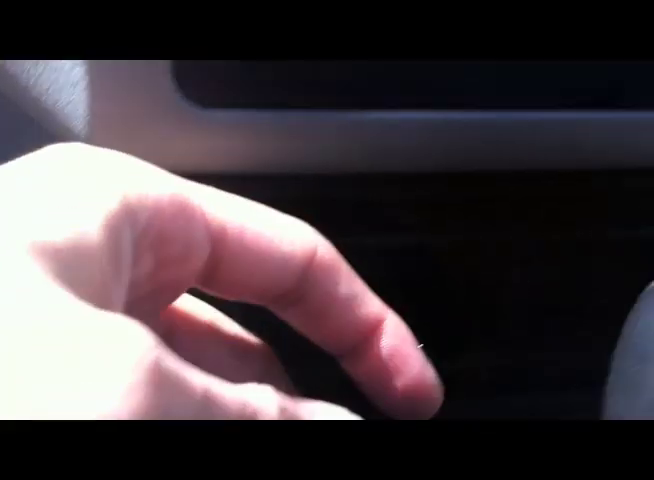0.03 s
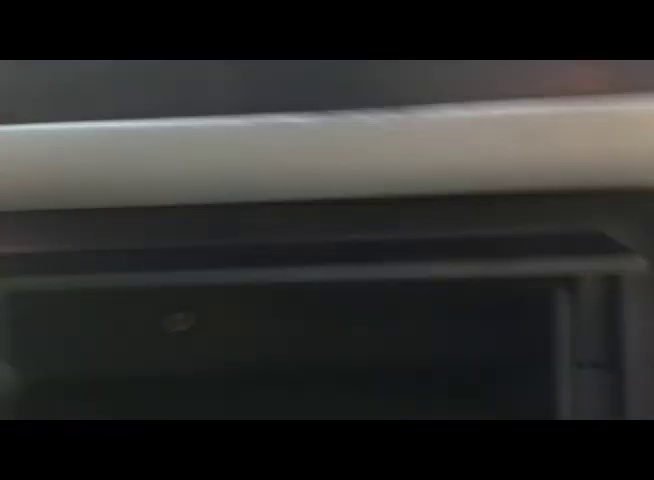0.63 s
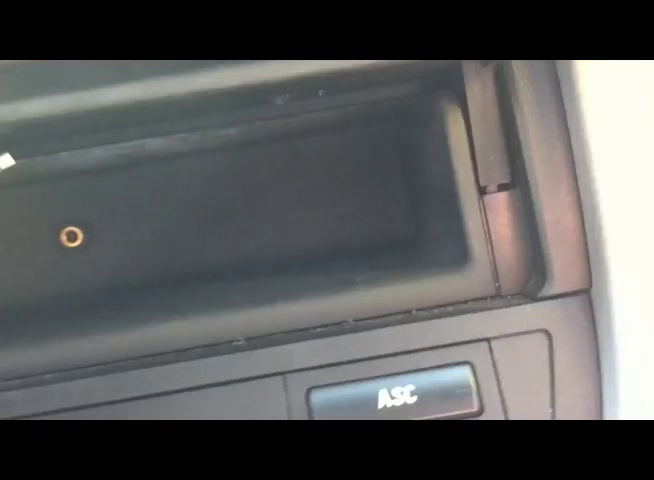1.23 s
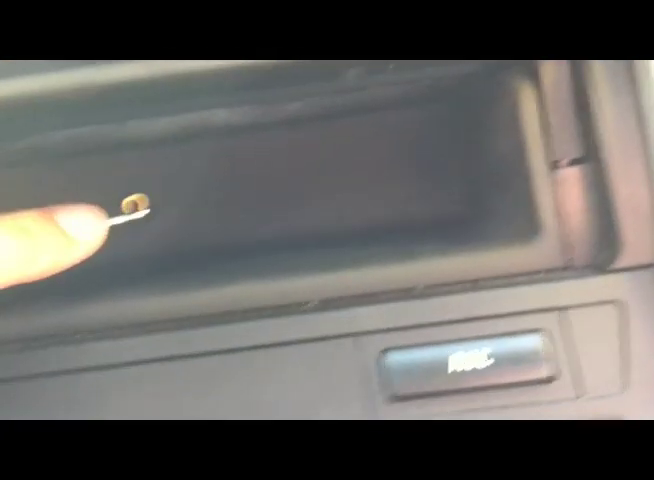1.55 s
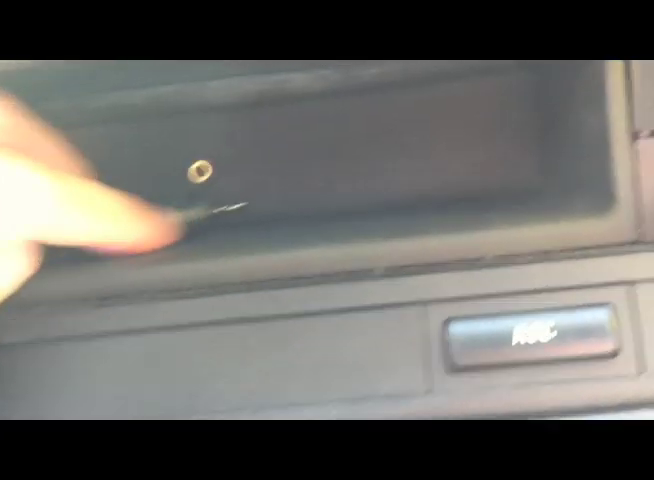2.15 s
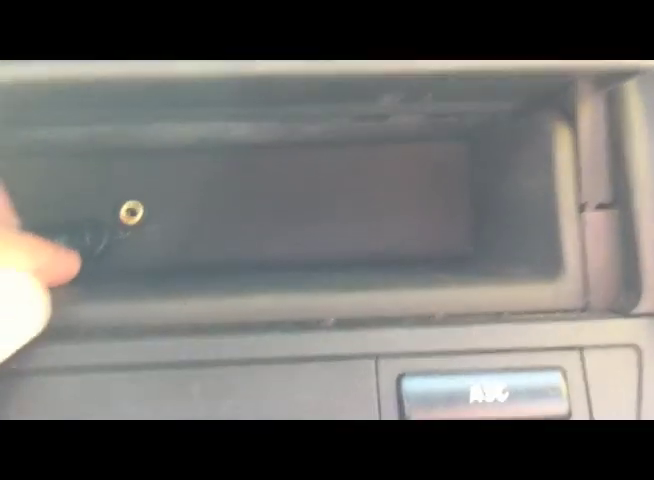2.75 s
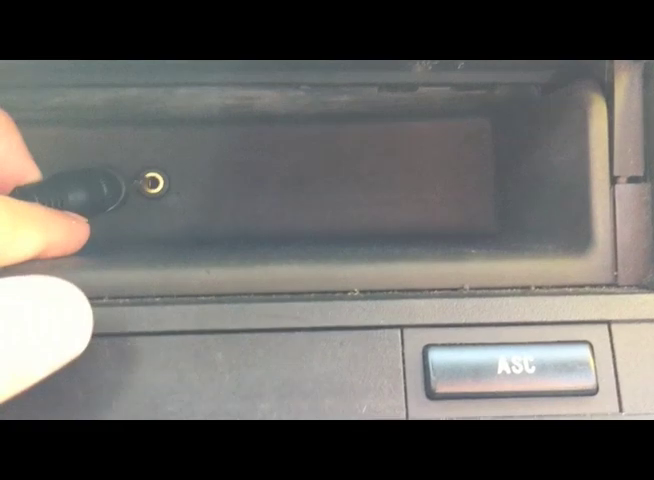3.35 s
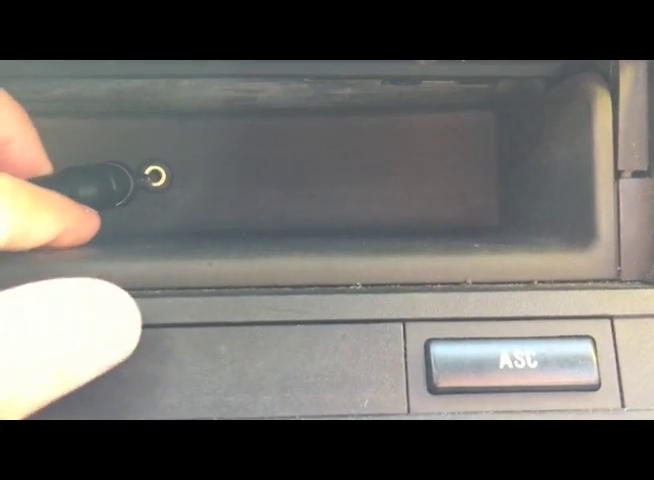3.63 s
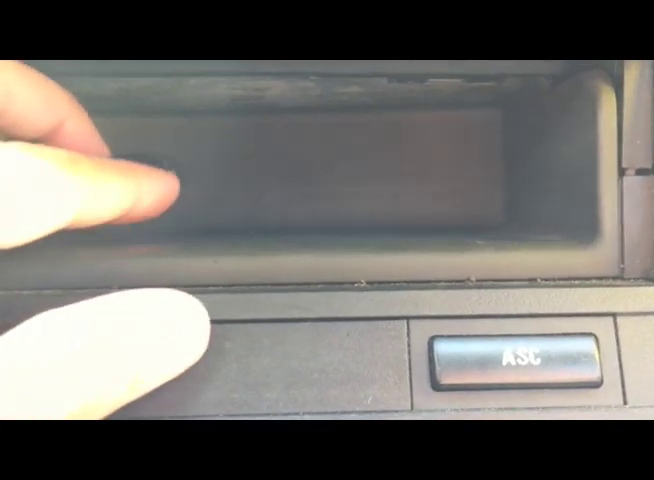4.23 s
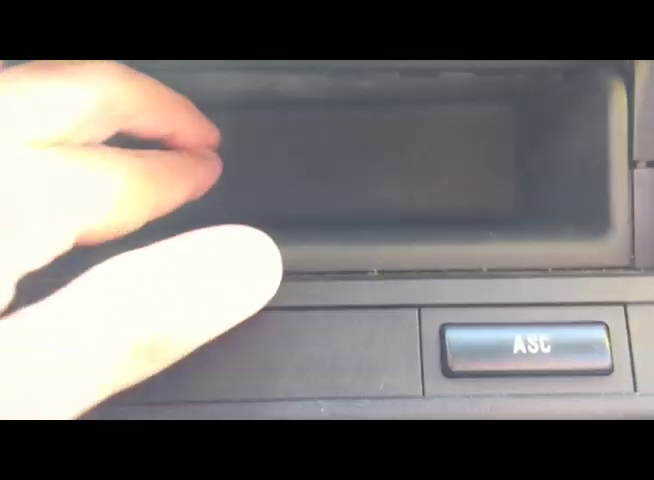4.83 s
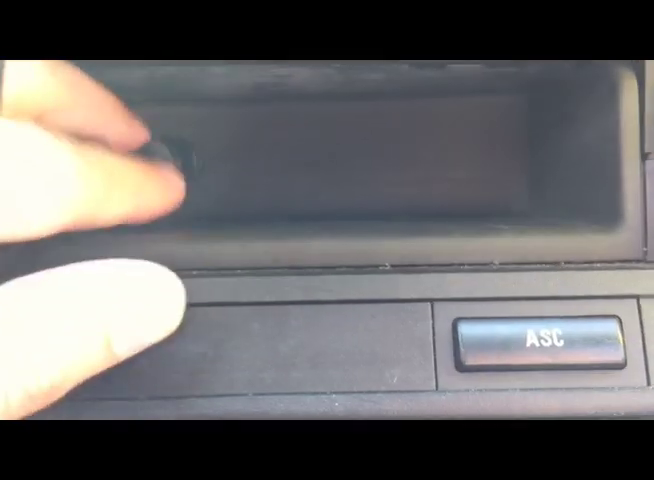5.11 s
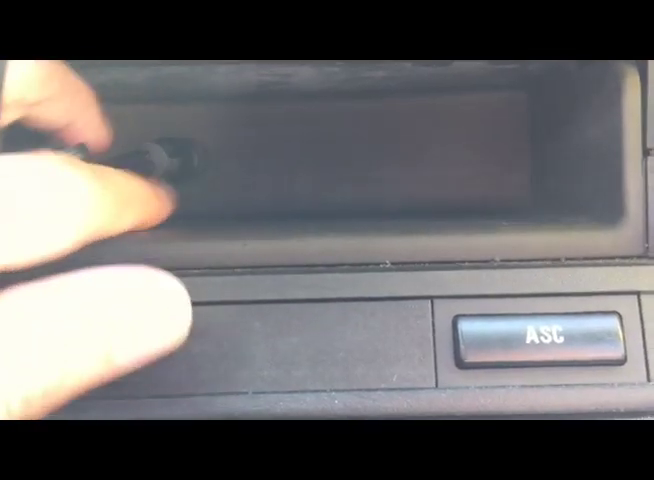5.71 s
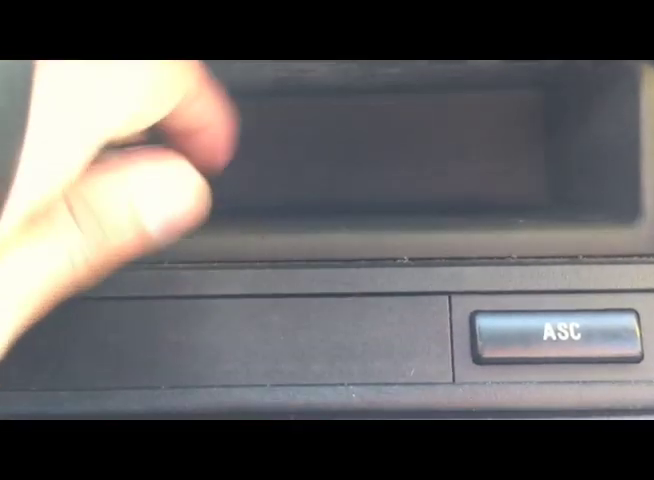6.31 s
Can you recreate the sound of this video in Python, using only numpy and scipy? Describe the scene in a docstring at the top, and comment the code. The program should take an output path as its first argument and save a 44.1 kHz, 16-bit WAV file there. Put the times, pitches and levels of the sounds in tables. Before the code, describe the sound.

Inside a parked car, a sleeve rustles softly as a hand feeds a cable into a plastic dashboard cubby. The metal tip of a small audio plug taps and scrapes around its socket, with dull hollow knocks, low rubs and tiny squeaks. The fumbling grows busier, then the plug snaps home with a loud double click and a few lighter taps. A small microphone picks it up close by, over faint cabin hiss.

```python
"""Inside a parked car: a hand feeds a cable into a plastic dashboard cubby and works a small audio plug
into its socket. The metal tip taps and scrapes around the hole amid low rubs and dull pushes, then the
plug snaps home with a loud double click. Each contact rings the cubby's hollow (thud), the panel
(knock) and the plug and socket (tick). A sleeve rustles at first, over the faint hiss of the cabin."""
import sys
import numpy as np
from scipy import signal
from scipy.fft import rfft, irfft
from scipy.io import wavfile

SR = 44100
rng = np.random.default_rng(int(sys.argv[2]) if len(sys.argv) > 2 else 0)


def put_to_file(sound):
    """Save the sound as 16-bit audio at rate SR, in the file named by the first command-line argument."""
    columns = np.atleast_2d(sound).T  # one column per channel
    safe = np.clip(columns, -1, 1)
    whole_steps = np.round(safe * 32767)
    wavfile.write(sys.argv[1], SR, whole_steps.astype(np.int16))


N = 289586

# modes of the cubby's hollow, the plastic panel, the plug and socket: f/Hz, width/Hz, gain/dB
HOLLOW_MODES = [(144.5, 41, -6), (185, 41, -4), (260, 35, 2.5), (373, 104, -3.5), (516, 114, -4.5)]
PANEL_MODES = [(644, 173, 3), (748, 36, 7.5), (848.6, 55, 4), (1161, 45, 3), (1288, 88, 1.5),
               (1542, 20.6, -0.5), (1667, 185, -6.5)]
PLUG_MODES = [(2280, 150, 2.5), (2560, 110, 1.5), (2960, 510, -0.5), (3656, 730, 0.5), (4520, 1290, -2),
              (5530, 530, 0), (6390, 1110, -3.5), (8590, 1200, -5.5), (12140, 3900, -10.5),
              (14700, 880, -7.5)]


def from_db(db):
    """Decibels to gain."""
    return 10 ** (np.asarray(db) / 20)


def rms(x):
    """Root mean square, never zero."""
    return np.sqrt(np.mean(x ** 2) + 1e-30)


def at_level(x, db):
    """Scale to an rms level."""
    return from_db(db) * x / rms(x)


def at_attack(x, db):
    """Scale by the rms level of the first 8 ms."""
    return from_db(db) * x / rms(x[:SR // 125])


def drift(rate_hz, size):
    """Random wander, spread near 1."""
    knots = np.arange(size) / SR * rate_hz
    return 1.2 * np.interp(knots, np.arange(4000), rng.standard_normal(4000))


def roll_off(x, hz, kind, order):
    """Butterworth low-pass or high-pass."""
    sos = signal.butter(order, np.clip(hz, 20, .45 * SR), kind, fs=SR, output="sos")
    return signal.sosfilt(sos, x)


def resonate(x, hz, width_hz):
    """One resonance, peak gain 1."""
    r = np.exp(-np.pi * width_hz / SR)
    feedback = [1, -2 * r * np.cos(2 * np.pi * hz / SR), r * r]
    return signal.lfilter(np.array([1, 0, -1]) * (1 - r * r) / 2, feedback, x + 1e-18)


def body(x, modes):
    """Parallel modes, alternating in sign."""
    return sum((-1) ** k * from_db(db) * resonate(x, hz, width_hz)
               for k, (hz, width_hz, db) in enumerate(modes))


def add(track, start_s, sound):
    """Mix a sound in at a time."""
    at = max(int(start_s * SR), 0)
    track[at:at + len(sound)] += sound[:max(N - at, 0)]


def coloured_noise(spectrum):
    """Noise of rms 1, shaped by rows of f/Hz, density/dB."""
    hz, db = np.transpose(spectrum)
    bins_hz = np.arange(N // 2 + 1) * SR / N
    gain = from_db(np.interp(np.log(bins_hz + 1), np.log(hz), db))
    return at_level(irfft(rfft(rng.standard_normal(N)) * gain, N), 0)


def burst(t, t60_s):
    """Decaying shower of tiny impulses, energy 1."""
    shower = rng.standard_normal(len(t)) * from_db(-60 * t / t60_s) * (1 - np.exp(-t / 0.00052))
    return shower / np.linalg.norm(shower)


def slips(size, per_s, spread_db):
    """Stick-slip: random jerks of uneven strength, rms 1."""
    jerks = (rng.random(size) < per_s / SR) * rng.standard_normal(size)
    return at_level(jerks * from_db(spread_db * np.minimum(rng.exponential(1, size), 3)), 0)


def soften(x, tick_re_db, middle_hz, middle_db):
    """Metal on metal is bright; a softer touch, with less tick re knock, loses its top."""
    octaves = np.tanh((tick_re_db - middle_db) / 4)
    return roll_off(x, middle_hz * 2 ** octaves, "low", order=1)


def slide_pressure(length_s, waver_db):
    """Envelope of one slide: grip, waver, release."""
    t = np.arange(SR // 2) / SR
    grip = np.clip(t / 0.0084, 0, 1)
    release_db = -60 * np.maximum(t - length_s, 0) / 0.11
    return grip * from_db(release_db + waver_db * drift(45.8, len(t)))


def cabin():
    """Faint steady hiss."""
    # f/Hz, relative density/dB
    spectrum = [(30, -10), (60, -42), (105, -13), (140, -15.5), (180, -6), (400, -15), (1070, -21.5),
                (1630, -21.5), (3200, -25.5), (5700, -26.5), (16000, -29.5)]
    return at_level(coloured_noise(spectrum), -66)


def sleeve():
    """Cloth swishes and flutters as the arm reaches in, then rests."""
    # arm movement: t/s, swish/dB, flutter/dB (both before trim)
    movement = [(0, -65, -66), (0.3, -63, -69), (0.55, -59.5, -59), (0.85, -60.5, -64), (1.1, -67, -69.5),
                (1.3, -80, -78)]
    # cloth spectra: f/Hz, relative density/dB
    swish_spectrum = [(500, -13), (900, -26), (1250, -10), (2200, -2.5), (3000, -5.5), (6000, -5),
                      (8250, -6), (9600, -13.5), (13200, -9.5), (16000, -16)]
    flutter_spectrum = [(60, -32), (135, -4.5), (270, 3), (420, 1), (600, -8), (800, -7.5), (1100, -20),
                        (2000, -59)]
    swish_trim_db, flutter_trim_db = -0.4, 4.3
    t = np.arange(N) / SR
    times_s, swish_db, flutter_db = np.transpose(movement)
    swish_gain = from_db(np.interp(t, times_s, swish_db) + swish_trim_db + .5 * drift(39.6, N))
    swish = swish_gain * coloured_noise(swish_spectrum)
    flutter_gain = from_db(np.interp(t, times_s, flutter_db) + flutter_trim_db + 2.2 * drift(70, N))
    flutter = flutter_gain * coloured_noise(flutter_spectrum)
    fade = from_db(-60 * np.maximum(t - times_s[-1], 0))
    return fade * (swish + flutter)


def handling():
    """Plug and cable brush the trim, with stray touches; both grow as the hand gets busier."""
    # activity of the hand: t/s, base level/dB
    activity = [(0.5, -67.5), (0.97, -69), (1.41, -70.5), (1.97, -59.5), (2.49, -68), (2.73, -65.5),
                (3.06, -71), (3.42, -89), (4.36, -60.5), (4.48, -49.5), (4.57, -58), (4.97, -64.5),
                (5.12, -82), (5.41, -57.5), (5.55, -56), (5.76, -65), (5.93, -57.5), (6.07, -63.5),
                (6.29, -57), (6.56, -61.5)]
    reach_s, touches_per_s = 0.5, 4
    t = np.arange(N) / SR
    base_db = np.interp(t, *np.transpose(activity))
    coarse = slips(N, per_s=400, spread_db=10)
    fine = slips(N, per_s=6100, spread_db=2)
    knock = roll_off(body(coarse, PANEL_MODES), 2000, "low", order=2)
    thud = roll_off(body(coarse + fine, HOLLOW_MODES), 410, "low", order=2)
    thud = roll_off(thud, 100, "high", order=2)
    grain = roll_off(body(fine + from_db(7) * coarse, PLUG_MODES), 3000, "low", order=1)
    brush = at_level(knock, 2) + at_level(thud, -2) + at_level(grain, -14)
    out = from_db(base_db + 0.82 * drift(20, N)) * np.minimum(t / reach_s, 1) * brush
    for k, (jitter, strength, spot) in enumerate(rng.uniform(-1, 1, (80, 3))):
        at_s = reach_s + (k + .5 * jitter) / touches_per_s
        if at_s < t[-1]:
            knock_db = base_db[int(at_s * SR)] + 2 + 2 * strength
            add(out, at_s, tap(knock_db, tick_drive_db=-11.5, spot_hz=1060 * 2 ** (.5 * spot)))
    return out


def tap(knock_db, tick_drive_db, spot_hz):
    """One touch: a push into panel and hollow, plus brief metallic chatter driven relative to it."""
    t = np.arange(SR // 6) / SR
    push = 1. * (t == 0)
    spot = resonate(push + from_db(-0.5) * burst(t, t60_s=0.033), spot_hz, width_hz=400)
    ringing = at_attack(spot, 0) + at_attack(body(spot, PANEL_MODES), -1)
    knock = roll_off(ringing, 2.39 * spot_hz, "low", order=3)  # a softer, lower spot yields more slowly
    hollow = body(push + from_db(-5) * burst(t, t60_s=0.087), HOLLOW_MODES)
    thud = roll_off(hollow, 470, "low", order=3)
    # high spots and light touches stir the hollow less
    thud_db = knock_db - 9.5 - np.log2(spot_hz / 950) - 0.13 * max(-45 - knock_db, 0)
    chatter = burst(t, t60_s=0.022)
    scatter = from_db(-11.5) * burst(t, t60_s=0.071)  # off hard trim close by
    tick = soften(body(chatter + scatter, PLUG_MODES), tick_drive_db, middle_hz=5700, middle_db=-7)
    tick_db = knock_db + tick_drive_db + 1.77
    return at_attack(thud, thud_db) + at_attack(knock, knock_db) + at_attack(tick, tick_db)


def slide(length_s, thud_db, knock_db, grain_db):
    """Coarse slips drive panel and hollow; fine grain hisses in the plug's modes."""
    pressure = slide_pressure(length_s, waver_db=2.46)
    # a light touch catches now and then, a firm one grinds
    per_s = np.clip(900 * from_db(knock_db + 50.5), 300, 2000)
    coarse = pressure * slips(len(pressure), per_s, spread_db=2)
    fine = pressure * slips(len(pressure), per_s=9000, spread_db=0.5)
    thud = roll_off(body(coarse + fine, HOLLOW_MODES), 520, "low", order=2)
    thud = roll_off(thud, 147, "high", order=2)
    knock = roll_off(body(coarse, PANEL_MODES), 2100, "low", order=2)
    grain = body(fine + from_db(-12.5) * coarse, PLUG_MODES)
    grain = soften(grain, grain_db - knock_db, middle_hz=7100, middle_db=-15.5)
    sound = at_level(thud, thud_db) + at_level(knock, knock_db) + at_level(grain, grain_db)
    return rms(pressure) * sound


def squeak(length_s, first_hz, last_hz, db):
    """Stick-slip locks roughly to one gliding pitch: steadier when low, raspier when high."""
    pressure = slide_pressure(length_s, waver_db=0.4)
    hz = np.interp(np.arange(len(pressure)) / SR, [0, length_s], [first_hz, last_hz])
    unsteady = roll_off(rng.standard_normal((2, SR)), 0.035 * first_hz, "low", order=2)[:, -len(hz):]
    phase = 2 * np.pi * np.cumsum(hz) / SR
    tone = pressure * (unsteady[0] * np.cos(phase) + unsteady[1] * np.sin(phase))
    return rms(pressure) * at_level(tone, db)


def plug_taps():
    """Plug and fingers strike around the hole: metal ticks strongly, skin weakly."""
    # single touches: t/s, knock level/dB, tick drive/dB, spot f/Hz
    touches = [(0.9295, -52.5, -23, 890), (1.011, -54, -4, 930), (1.2359, -69, 10.5, 890),
               (1.35, -43.5, -16, 800), (1.392, -67.5, 13.5, 900), (1.5418, -36.5, -3, 1100),
               (1.6104, -50, -18, 770), (1.9518, -39.5, -18, 570), (2.1512, -42.5, 1, 1130),
               (2.2295, -46, -2, 1090), (2.4356, -43.5, -22, 620), (2.538, -45.5, -9.5, 570),
               (2.6183, -53, -6, 740), (2.7234, -46, -14.5, 745), (3.1875, -54.5, -12, 1120),
               (3.3451, -46, -6.5, 990), (3.3976, -40.5, -11.5, 790), (3.691, -47.5, -13.5, 1230),
               (3.8604, -57, -3, 1240), (3.876, -51, -22, 1550), (4.094, -48.5, -13, 1260),
               (4.1161, -52.5, -12, 1310), (4.269, -51.5, -15, 1240), (4.2958, -48.5, -17, 1230),
               (4.3336, -40.5, -35, 1300), (4.3374, -39, -34, 736), (4.428, -34.5, -5.5, 860),
               (4.5063, -35.5, -5.5, 900), (4.7322, -38.5, -4, 874), (4.8508, -44, -11, 890),
               (4.8637, -42.5, -11.5, 880), (5.0499, -44, -1.5, 1500), (5.059, -47, -5, 1250),
               (5.111, -38, -6, 1090), (5.367, -47, -15, 740), (5.518, -49.5, -14, 740),
               (5.5544, -50.5, 8, 1260), (5.6843, -29.5, -10, 804), (6.0745, -39.5, -32, 900),
               (6.0935, -35, -14, 900), (6.103, -24, -16.5, 610), (6.1469, -38, -5.5, 910),
               (6.2848, -39.5, -6, 1050), (6.4142, -38.5, -11.5, 910), (6.549, -38.5, -7.5, 1110)]
    # dull landings that slip off an edge and click: t/s, knock level/dB, slip delay/s, landing f/Hz
    catches = [(1.9817, -42, .0238, 636), (2.04, -38, .0346, 574), (4.5751, -33, 0.0038, 1560),
               (4.591, -29.5, 0.02, 690), (4.9723, -39, .0303, 730), (5.6175, -32.5, 0.00456, 600),
               (6.462, -45, 0.0099, 925)]
    out = np.zeros(N)
    for at_s, knock_db, tick_drive_db, spot_hz in touches:
        add(out, at_s, tap(knock_db, tick_drive_db, spot_hz))
    for at_s, knock_db, slip_s, landing_hz in catches:
        add(out, at_s, tap(knock_db, tick_drive_db=-22, spot_hz=landing_hz))
        add(out, at_s + slip_s, tap(knock_db, tick_drive_db=-4.5, spot_hz=950))
    return out


def plug_slides():
    """Friction on trim and socket: the metal tip hisses, the plastic barrel scuffs."""
    # plug scraping: start/s, end/s, knock level/dB, grain drive/dB
    scrapes = [(1.135, 1.17, -52.5, 1.5), (1.335, 1.407, -63, 4.5), (1.663, 1.781, -62.5, 3),
               (1.795, 1.966, -59, 0), (2.089, 2.326, -61.5, -0.5), (2.981, 3.198, -61, -9),
               (3.349, 3.403, -51, -4.5), (3.763, 3.885, -61.5, -12), (4.058, 4.1, -56.5, -11),
               (4.327, 4.36, -46.5, -21.5), (4.657, 4.781, -50, -2), (4.999, 5.155, -51.5, -3),
               (5.151, 5.257, -65.5, -1), (5.688, 5.734, -52, 3), (5.96, 5.973, -46, -18),
               (6.071, 6.159, -49.5, -4.5), (6.163, 6.32, -61.5, 0)]
    # low rubs and dull pushes, heard mostly in the hollow: start/s, end/s, drive/dB
    rubs = [(1.924, 1.97, -42), (2.364, 2.47, -45), (2.521, 2.584, -39.5), (4.809, 4.866, -42),
            (5.679, 5.703, -39.5), (6.358, 6.43, -50)]
    # slides that groan or squeak: start/s, end/s, first f/Hz, last f/Hz, level/dB
    squeaks = [(1.146, 1.173, 2204, 2400, -56), (1.66, 1.716, 2560, 2560, -69),
               (2.361, 2.418, 221.6, 270, -47.5), (2.531, 2.581, 266, 275.7, -40),
               (2.543, 2.587, 625, 654, -48.5), (4.649, 4.695, 1783, 1720, -50),
               (5.034, 5.149, 1643, 1680, -56.5), (5.05, 5.166, 3800, 3670, -62),
               (5.169, 5.28, 3660, 3660, -72.5), (5.959, 5.975, 898, 794, -43.5),
               (5.961, 5.972, 1660, 1734, -49.5), (6.082, 6.205, 2740, 2740, -61.5)]
    lead_s = 0.004
    out = np.zeros(N)
    for start_s, end_s, knock_db, grain_drive_db in scrapes:
        thud_db = knock_db - 2.5 + 0.58 * grain_drive_db  # the tip bears harder than the barrel
        grain_db = knock_db - 3 + grain_drive_db
        add(out, start_s - lead_s, slide(end_s - start_s, thud_db, knock_db, grain_db))
    for start_s, end_s, db in rubs:
        rub = slide(end_s - start_s, thud_db=db - 5.5, knock_db=db - 15, grain_db=db - 26.5)
        add(out, start_s - lead_s, rub)
    for start_s, end_s, first_hz, last_hz, db in squeaks:
        add(out, start_s - lead_s, squeak(end_s - start_s, first_hz, last_hz, db))
    return out


def socket_spring():
    """The spring contact drops into the plug's groove and rings socket and mounting."""
    # ringing modes: f/Hz, width/Hz, gain/dB
    modes = [(323, 16, -9.5), (687, 76, -1.5), (750, 62, 3.5), (900, 100, 1), (1150, 32, -4),
             (1260, 38, -8), (3620, 250, -16), (6360, 280, -8), (14300, 600, -22)]
    t = np.arange(SR // 10) / SR
    ringing = sum((-1) ** k * from_db(db) * np.exp(-np.pi * width_hz * t) * np.sin(2 * np.pi * hz * t)
                  for k, (hz, width_hz, db) in enumerate(modes))
    finger_damping = from_db(-60 * t / 0.12)
    onset = 1 - np.exp(-t / 0.0017)
    return at_attack(ringing * finger_damping * onset, -14.5)


def plug_snap():
    """Double click: the plug's shoulder hits the socket and rebounds while the spring rings."""
    seat_s, rebound_s = 6.3182, 0.014
    out = np.zeros(N)
    add(out, seat_s, tap(knock_db=-16, tick_drive_db=-10.5, spot_hz=740))
    add(out, seat_s, socket_spring())
    add(out, seat_s + rebound_s, tap(knock_db=-24, tick_drive_db=-10.5, spot_hz=800))
    return out


def scene():
    """Plug, sleeve, cabin and handling in mono."""
    plug = plug_taps() + plug_slides() + plug_snap()
    return (plug + sleeve() + cabin() + handling())[None]


def record(dry):
    """Small microphone: thin bass, steep top edge."""
    cutoff_hz = 15900
    thin = roll_off(dry, 35, "high", order=1)
    return signal.sosfilt(signal.ellip(10, .1, 80, cutoff_hz, fs=SR, output="sos"), thin)


dry = scene()
out = record(dry)
put_to_file(out)
```